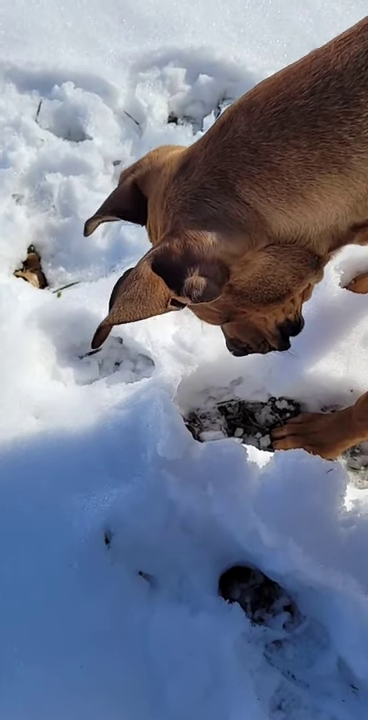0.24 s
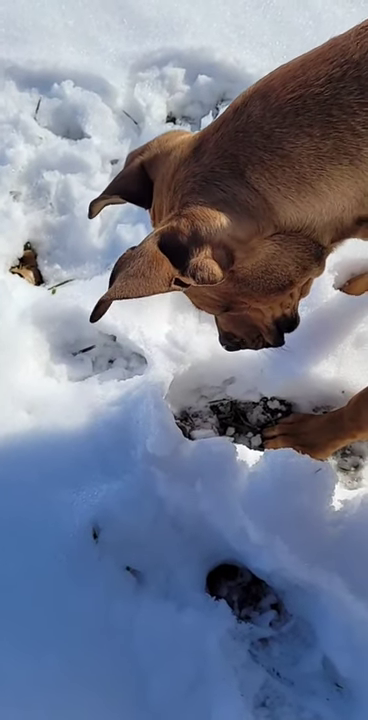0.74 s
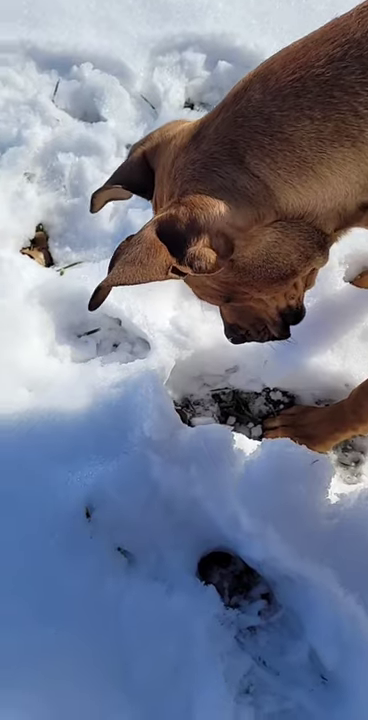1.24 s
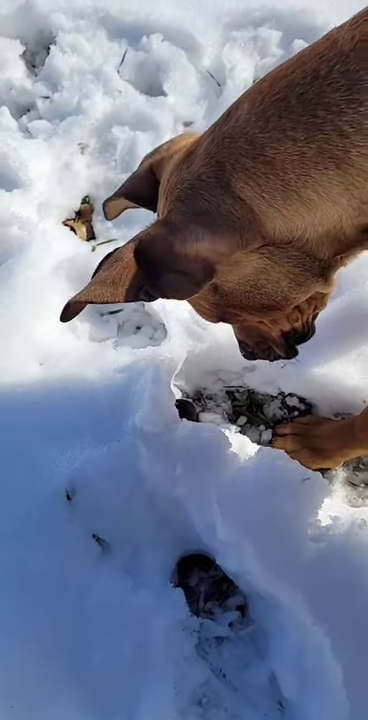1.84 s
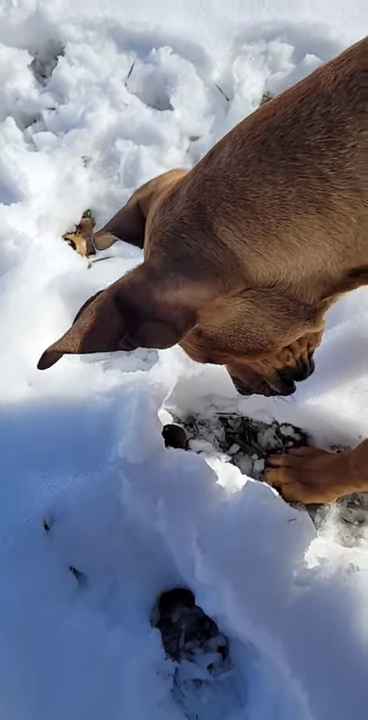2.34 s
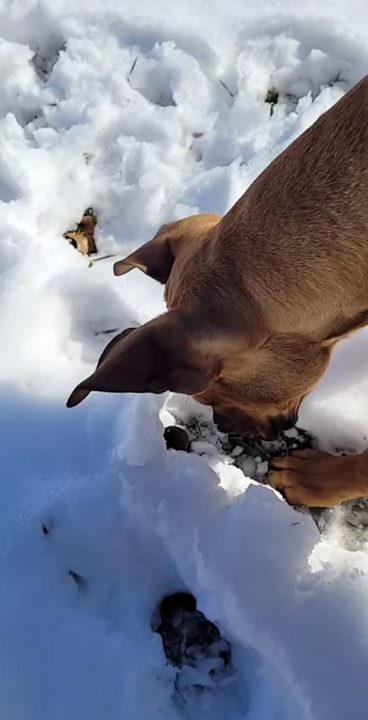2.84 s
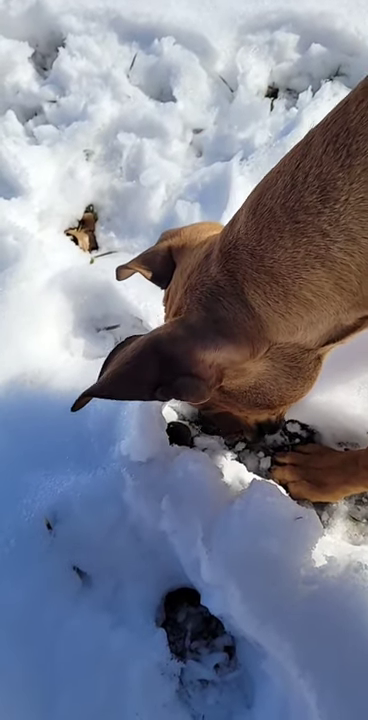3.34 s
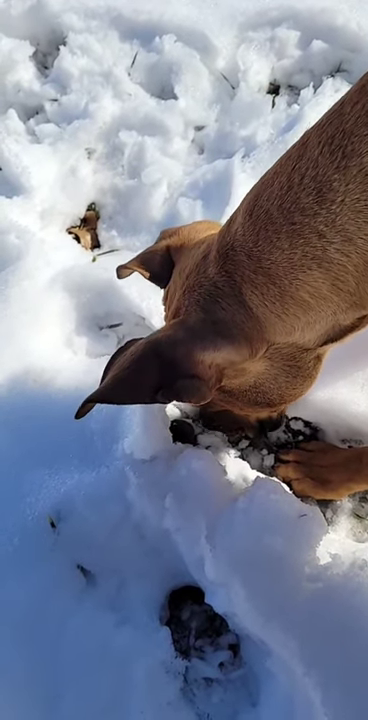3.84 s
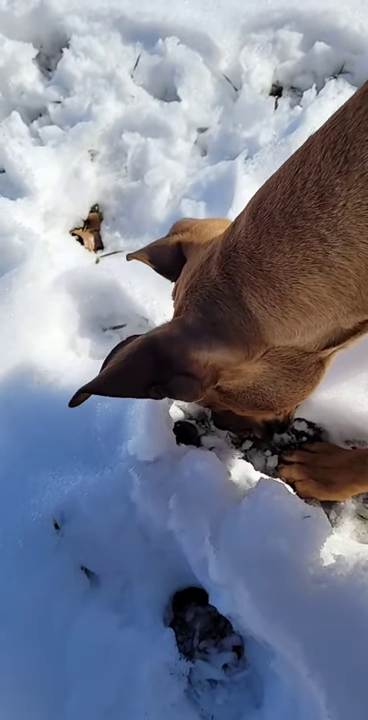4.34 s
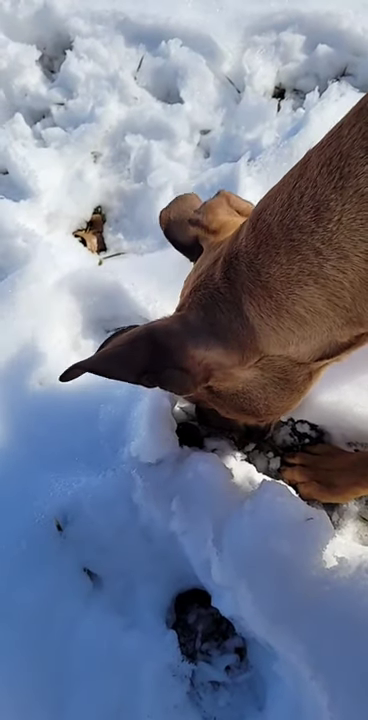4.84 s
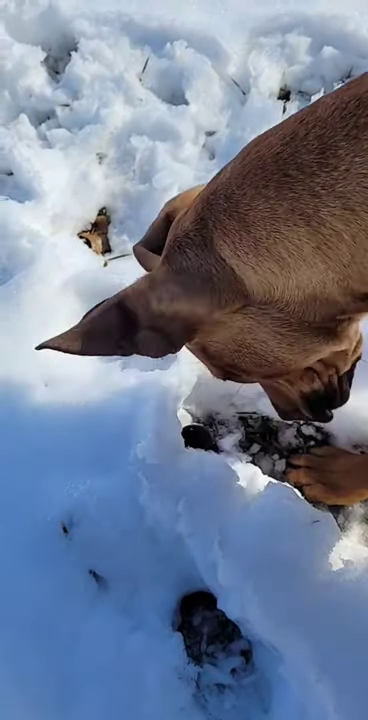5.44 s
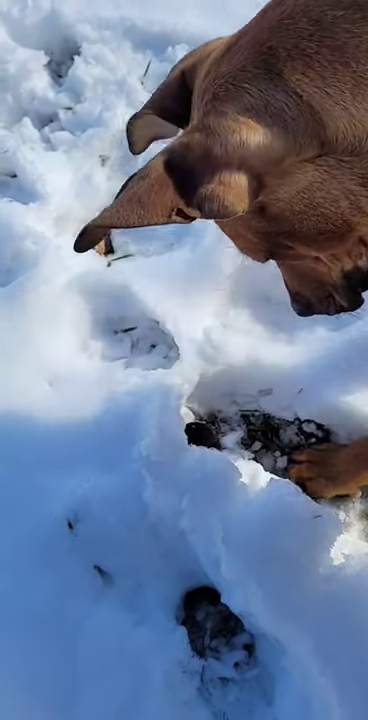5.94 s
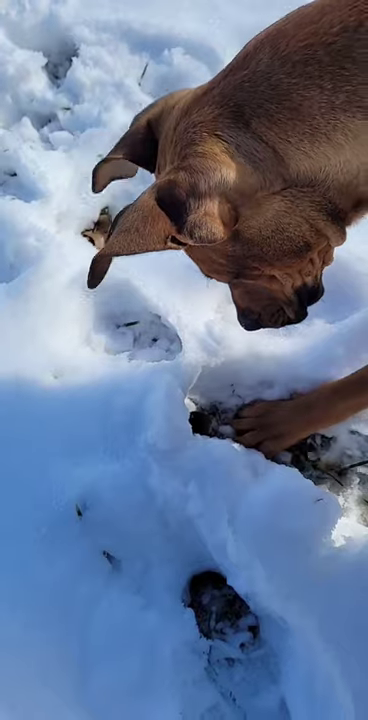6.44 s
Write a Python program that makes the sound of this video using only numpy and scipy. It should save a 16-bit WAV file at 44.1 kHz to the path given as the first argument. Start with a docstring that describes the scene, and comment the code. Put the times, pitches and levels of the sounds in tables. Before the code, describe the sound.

Close snow scuffling and soft paw thuds, then quiet with far engine drone, sparse sharp bird chips and faint sniffs, ending in crisp rustle and one tiny squeak.

```python
"""Far traffic hums under the fading ring of a bird chip; then a dog sniffs, snorts and paws at a hole in snow.
The dog is a step from a phone: coloured noise makes breath and snow, decaying modes make paw thuds.
The small animal inside squeaks once, a harmonic stack through a throat filter that breaks into breath.
The bird's gliding whistles ring back from walls and trees; traffic is flickering octave bands of noise.
One engine, three multiples of its firing rate, drones and then pulls away."""
import sys
import numpy as np
from scipy import signal
from scipy.fft import rfft, irfft
from scipy.io import wavfile
from scipy.ndimage import uniform_filter1d

SR = 44100
rng = np.random.default_rng(int(sys.argv[2]) if len(sys.argv) > 2 else 0)


def int16_out(signal):
    """Quantize to a 16-bit WAV file."""
    q = np.round(np.clip(np.atleast_2d(signal).T, -1, 1) * 32767)
    wavfile.write(sys.argv[1], SR, q.astype(np.int16))


N = 295911
T = np.arange(N) / SR


def undb(db):
    """Decibel law: amplitude grows tenfold every 20 dB."""
    return 10 ** (np.asarray(db) / 20)


def shape(x, points):
    """Linear filtering: weight the spectrum by (Hz, dB) points, steeply closed outside them."""
    hz, db = np.transpose(points)
    log_hz = np.log(np.fft.rfftfreq(len(x), 1 / SR) + 1)
    gain_db = np.interp(log_hz, np.log(hz), db, left=-90, right=-90)
    return irfft(rfft(x) * undb(gain_db), len(x))


def unit(x):
    """Normalisation: scale to a root-mean-square value of 1."""
    return x / np.sqrt(np.mean(x ** 2))


def noise(colour):
    """Random process: white noise given a spectral colour and unit power."""
    return unit(shape(rng.standard_normal(N), colour))


def walk(rate):
    """Slow random modulation: levels held 1 / rate s and slewed twice."""
    hold = int(SR / rate)
    steps = np.repeat(rng.standard_normal(N // hold + 1), hold)
    return uniform_filter1d(uniform_filter1d(steps, hold), hold)[:N]


def add(out, x, s):
    """Superposition: mix x into out from s seconds on."""
    i = int(round(s * SR))
    x = x[max(-i, 0):N - i]
    out[max(i, 0):max(i, 0) + len(x)] += x


SURGE_POWER = 1.4  # 1 = pointed, 2 = round top


def surges(rows):
    """Incoherent addition: gains swell to each peak and fade, adding in power, one line per dB column."""
    power = 0
    for s, rise, fall, db, *over in rows:
        # times below 2 ms, negative ones too, count as 2 ms
        away = np.where(T < s, (s - T) / max(rise, .002), (T - s) / max(fall, .002))
        peak_db = db + np.array([0] + over)[:, None]
        power = power + undb(2 * peak_db) * undb(-2 * 20 * away ** SURGE_POWER)
    return np.sqrt(power)


# spectral density of the microphone's own hiss: pitch_hz [Hz], density_db [dB per Hz]
HISS_COLOUR = [(1470, -20), (2500, -11.5), (3130, -1.5), (5450, -5), (6410, -7), (7650, 5.5), (8520, -4),
               (14300, -4), (15800, -4.5)]
HISS_DB = -89


def hiss():
    """Self-noise: a steady random signal of fixed spectrum."""
    return undb(HISS_DB) * noise(HISS_COLOUR)


# spectral density of the road noise: pitch_hz [Hz], density_db [dB per Hz]
TRAFFIC_COLOUR = [(20, -24), (45, -3.5), (65, 0), (110, -6), (155, -6), (190, -12.5), (280, -9), (420, -14),
                  (800, -15), (1050, -21.5), (1300, -40), (1800, -51), (3000, -56)]
# swells of the traffic: start_s [s], level_db [dB], bass_db [dB over level], tyre_db [dB over level]
TRAFFIC_SWELL = [(0.0, -67, -0.5, 3), (0.35, -63, -4, -1.5), (.8, -64, -3, 1.5), (1.57, -62.5, 0.5, -0.5),
                 (2.4, -63.5, -2, -1.5), (3.5, -61.5, -1, 0), (4.0, -62, 1.5, 0), (5.2, -62, 1, -1),
                 (6.1, -63.5, -0.5, 0.5), (6.71, -60, -1, -3.5)]


def traffic():
    """Band-wise modulation: octave bands flicker on their own; the bass swells as vehicles come and go."""
    s, db, bass_db, tyre_db = np.transpose(TRAFFIC_SWELL)
    road = rfft(shape(rng.standard_normal(N), TRAFFIC_COLOUR))
    octaves = np.log2(np.fft.rfftfreq(N, 1 / SR) + 1)
    # the level refers to the band around 530 Hz
    reference = np.std(irfft(road * (abs(octaves - np.log2(530)) < .4), N))
    out = 0
    for octave in np.arange(4, 13):
        band = irfft(road * np.clip(1 - abs(octaves - octave), 0, 1), N)
        bass_share = np.clip((9.0 - octave) / 2, 0, 1)
        band_db = bass_share * np.interp(T, s, bass_db) + 1.5 * walk(4.5)
        if octave == 10:  # tyre roar lies around 1 kHz
            band_db = band_db + np.interp(T, s, tyre_db)
        out = out + band * undb(band_db)
    return out / reference * undb(np.interp(T, s, db))


# course of the far engine: start_s [s], firing_hz [Hz, before its waver],
# first_db [dB, firing rate], lead_db [dB, leading overtone]
ENGINE_COURSE = [(2.3, 82, -62, -77), (2.6, 84, -58.5, -63.5), (3.1, 87.3, -59.5, -63),
                 (3.25, 90.6, -51, -63.5), (3.8, 91.9, -50.5, -60), (4.5, 91.8, -47.5, -64),
                 (5.5, 88.5, -50, -64.5), (5.75, 85, -70, -78), (6.0, 88.1, -66, -76),
                 (6.15, 93.9, -54, -76), (6.24, 97.85, -57.5, -59.5), (6.35, 101, -59, -57),
                 (6.56, 106.8, -50, -63), (6.64, 109.3, -63, -58.5), (6.71, 110, -60, -66)]
# overtone balance, one row droning and one pulling away: second_db, third_db [dB over lead_db]
ENGINE_OVERTONES = [(-11.5, -0.5), (0.5, -6.5)]
# waver of each multiple: spread_db [dB], phase_spread [radians], rate [changes per s]
AIR_WAVER = [(2.0, .3, 14), (3.0, .6, 20), (5.0, 2.5, 60)]
PULLS_AWAY_S = 5.9


def engine():
    """Harmonic series: three multiples of the firing rate, wavering most on top after the long way in air."""
    s, hz, first_db, lead_db = np.transpose(ENGINE_COURSE)
    firing_hz = np.interp(T, s, hz) * (1 + 0.011 * walk(12))
    phase = 2 * np.pi * np.cumsum(firing_hz) / SR
    levels_db = [np.interp(T, s, first_db)]
    for droning_db, leaving_db in np.transpose(ENGINE_OVERTONES):
        balance_db = np.where(T < PULLS_AWAY_S, droning_db, leaving_db)
        levels_db.append(np.interp(T, s, lead_db) + balance_db)
    out = 0
    for multiple, (db, (waver_db, turn, rate)) in enumerate(zip(levels_db, AIR_WAVER), 1):
        tone = np.sqrt(2) * np.sin(multiple * phase + turn * walk(rate))
        out = out + tone * undb(db + waver_db * walk(rate))
    fade_in = np.clip((T - s[0]) / 0.25, 0, 1)
    return fade_in * out


# colour of the ring from the trees: pitch_hz [Hz], level_db [dB]
TREE_COLOUR = [(5000, -1.5), (5800, 4.5), (6500, 4.5), (7400, 1), (12000, 5.5), (16000, -10)]
# echoes from house walls: delay_s [s], level_db [dB over the direct sound]
WALL_ECHOES = [(.011, -11), (0.057, -10)]
TREES_T60_S, TREES_DB = 0.69, -6.5


def space():
    """Impulse response: the direct sound, discrete wall echoes and a dense decaying ring from the trees."""
    t = np.arange(SR) / SR
    ring_db = -60 * t / TREES_T60_S + 1.4 * walk(37)[:SR]
    ring = shape(rng.standard_normal(SR), TREE_COLOUR) * undb(ring_db)
    ring = ring * np.clip(t / 0.0037, 0, 1)
    response = undb(TREES_DB) * ring / np.sqrt(np.sum(ring ** 2))
    response[0] = 1
    for delay, echo_db in WALL_ECHOES:
        response[int(delay * SR)] += undb(echo_db)
    return response


# glide of one chip: start_s [s from its start], pitch_hz [Hz, before the pitch factor], level_db [dB over peak]
CHIP_GLIDE = [(0, 5950, -40), (.0022, 6000, -9), (.0045, 6550, -4), (.0065, 6900, -7), (.010, 7150, -4),
              (.013, 7270, 0), (.017, 7350, -1), (.0188, 7500, -13), (.021, 7700, -3), (.0255, 7900, -36)]
# the chips: start_s [s], peak_db [dB, direct sound], pitch_factor [ratio], octave_db [dB over the whistle]
CHIP_CALLS = [(-.22, -54, 1.1, -32), (1.9637, -48.5, 1.002, -23), (3.7662, -46.5, 0.998, -18.5),
              (5.9597, -48, 0.9967, -16)]


def bird():
    """Frequency modulation and convolution: rising whistled chips sound through the response of the space."""
    s, hz, db = np.transpose(CHIP_GLIDE)
    t = np.arange(int(s[-1] * SR)) / SR
    level_db = uniform_filter1d(np.interp(t, s, db), size=30)
    octave_swell = np.exp(-((t - .003) / .0022) ** 2)  # most as the bill opens
    response, out = space(), np.zeros(N)
    for start, peak_db, factor, octave_db in CHIP_CALLS:
        phase = 2 * np.pi * np.cumsum(factor * np.interp(t, s, hz)) / SR
        tone = np.sin(phase) + undb(octave_db) * octave_swell * np.sin(2 * phase)
        chip = tone * undb(peak_db + level_db)
        add(out, signal.fftconvolve(chip, response), start)
    return out


# the squeak's arch: start_s [s], pitch_hz [Hz], level_db [dB, before the throat]
SQUEAK_ARCH = [(6.585, 2700, -75), (6.588, 2600, -48), (6.590, 2400, -45), (6.593, 2880, -41),
               (6.5955, 3100, -39), (6.600, 2780, -41), (6.603, 2400, -40), (6.609, 2000, -44),
               (6.6125, 2050, -48), (6.615, 2000, -64), (6.63, 2000, -75)]
# response of the tiny throat: pitch_hz [Hz], level_db [dB]
THROAT_COLOUR = [(1500, -48), (3000, -36), (4200, -15), (5200, -5), (6000, -3), (8200, 0), (10000, -4),
                 (11800, 0), (12800, -15), (14000, -30), (15900, -34)]
# the 3rd multiple drops out at the top of the arch: centre_s [s], width_s [s], depth_db [dB]
THIRD_DROPOUT = (6.5978, .0018, -26)
# the voice roughens away from its clearest moment, then is all breath
CLEAR_S, CLEAR_ROUGH, ROUGH_PER_S, BREAKS_S = 6.595, .05, 30, 6.613


def squeak():
    """Source and filter: fluttering harmonics pass a tiny throat, giving way to breath towards both ends."""
    s, hz, db = np.transpose(SQUEAK_ARCH)
    t = np.arange(s[0], s[-1], 1 / SR)
    rough = np.clip(CLEAR_ROUGH + ROUGH_PER_S * abs(t - CLEAR_S) + (t > BREAKS_S), 0, 1)
    gap_s, gap_width_s, gap_depth_db = THIRD_DROPOUT
    gap_db = gap_depth_db * np.exp(-((t - gap_s) / gap_width_s) ** 2)
    phase = 2 * np.pi * np.cumsum(uniform_filter1d(np.interp(t, s, hz), size=70)) / SR
    stack = 0
    for k in range(1, 8):
        flutter_db = -22 * rough * abs(walk(500)[:len(t)])
        stack = stack + np.sin(k * phase + k * k) * undb(flutter_db + (k == 3) * gap_db)
    breath = 1.7 * rough * rng.standard_normal(len(t))
    voice = (1 - rough) * stack + breath
    out = np.zeros(N)
    add(out, voice * undb(np.interp(t, s, db)), s[0])
    return shape(out, THROAT_COLOUR)


# soft sniffs deep in the hole: peak_s [s], rise_s [s per 20 dB], fall_s [s per 20 dB], peak_db [dB]
SNIFF_SURGES = [(4.05, 0.5, -0.3, -84), (4.35, 1.5, 0.5, -86), (4.79, 0.5, 0.1, -86),
                (5.04, 0.3, 0.25, -81), (5.38, 0.19, 0.19, -83), (5.65, .5, 1.3, -85.5),
                (6.2, 0.1, -0.2, -81.5), (6.4, 1, 4.98, -89.5)]
# spectral density of a sniff: pitch_hz [Hz], density_db [dB per Hz]
SNIFF_COLOUR = [(4000, -21), (5500, -8), (6500, -5), (7500, 2), (8300, -5.5), (9500, -14), (11000, -32)]


def sniffs():
    """Turbulence noise: soft breath deep in the hole is coloured noise in surges."""
    return surges(SNIFF_SURGES)[0] * noise(SNIFF_COLOUR)


# the tap: start_s [s], peak_db [dB], pitch_hz [Hz], t60_s [s]
TAP_KNOCK = (.9455, -62, 1470, .03)


def tap():
    """Free vibration: a small hard thing, knocked once, decays at a single pitch."""
    s, db, hz, t60 = TAP_KNOCK
    t, out = np.arange(SR // 10) / SR, np.zeros(N)
    add(out, np.sin(2 * np.pi * hz * t) * undb(db - 60 * t / t60), s)
    return out


# snow packing under the paw: peak_s [s], rise_s [s per 20 dB], fall_s [s per 20 dB], peak_db [dB]
PACKING_SURGES = [(1.35, 0.1, -0.03, -55), (1.52, -0.17, -0.07, -47), (1.576, 0.1, 0.03, -41.5)]
# spectral density of the packing snow: pitch_hz [Hz], density_db [dB per Hz]
PACKING_COLOUR = [(60, -11), (100, -5), (280, 7), (450, -10.5), (750, -3.5), (1200, -30)]


def packing():
    """Compaction noise: snow packing down under the paw is low coloured noise in surges."""
    return surges(PACKING_SURGES)[0] * noise(PACKING_COLOUR)


# paw blows: start_s [s], level_db [dB, before the modes' weights and soft onset], centre_hz [Hz, spectrum]
PAW_BLOWS = [(1.4669, -29, 280), (1.489, -38.5, 110), (1.508, -37.5, 132), (1.516, -31, 89),
             (1.553, -45, 330), (1.575, -30.5, 273.4), (1.593, -44, 330), (1.613, -40, 100),
             (1.655, -28.5, 330), (1.658, -30, 152), (1.674, -38.5, 54.7)]
# modes of packed snow and frozen ground: pitch_hz [Hz, before scatter], level_db [dB], t60_s [s]
GROUND_MODES = [(58, 0, .13), (130, 0, .11), (240, 1, .04), (320, 0, .045), (430, -3, .03)]


def thuds():
    """Modal excitation: each blow rings the ground's modes, most those near the centre of its spectrum."""
    t, out = np.arange(SR // 3) / SR, np.zeros(N)
    soft_onset = 1 - np.exp(-t / 0.0019)  # a paw lands softly
    for s, db, centre_hz in PAW_BLOWS:
        blow = 0
        for hz, mode_db, t60 in GROUND_MODES:
            excited_db = mode_db - 12.5 * np.log2(hz / centre_hz) ** 2
            scattered_hz = hz * (1 + 0.043 * rng.standard_normal())
            blow = blow + undb(excited_db - 60 * t / t60) * np.sin(2 * np.pi * scattered_hz * t)
        add(out, -blow * undb(db) * soft_onset, s)
    return out


# main, low, middle and high part of the snow's colour: pitch_hz [Hz], density_db [dB per Hz]
SNOW_PARTS = [
    [(4800, -21), (5500, 0), (6300, 1), (7900, 1.5), (8500, -10), (9800, -19.5)],
    [(900, -0.5), (1500, -0.5), (2400, -2), (2850, -6), (3200, -24)],
    [(3150, -11), (3600, -5), (4700, -2.5), (5400, -2.5), (6000, -18)],
    [(9000, -9), (10400, -6.5), (12300, 0.5), (13800, -5.5), (16000, -7.5)],
]
# nose and paws in the snow: peak_s [s], rise_s [s per 20 dB], fall_s [s per 20 dB], peak_db [dB],
# low_db, middle_db, high_db [dB over peak_db]
SNOW_RUSTLES = [(.36, 0.049, 0.047, -91, -15, -15, -10.5), (.435, 0.045, 0.063, -72, -18.5, -16.5, -2.5),
                (.53, 0.12, 0.05, -64.5, -14.5, -6, -1.5), (.582, 0.038, 0.025, -61.5, 4, 0, 0),
                (.62, 0.022, 0.096, -85.5, 3.5, -5, 1), (.78, .05, 0.072, -94, -10, -20, -12),
                (1.0, 0.176, 0.133, -85, -6, -11, -5), (1.04, 0.018, 0.045, -84, -6, -12, 8.5),
                (1.12, 0.078, .06, -73, -6, -12, -12), (1.2, 0.086, 0.14, -66.5, -9, -6, -5),
                (1.28, 0.16, 0.075, -70.5, -4, -16, -7), (1.348, 0.0647, 0.11, -63, -3.5, -5, -1),
                (1.425, 0.12, 0.065, -65.5, -6.5, -6, -6), (1.47, 0.013, 0.047, -61.5, -2, -4, -3),
                (1.51, 0.0062, 0.16, -59, 1, -2, -7), (1.59, 0.119, 0.0813, -59.5, 0.5, -4, -5.5),
                (1.66, 0.012, .022, -54.5, -2, -5, -2.5), (1.7, 0.034, 0.07, -74, -4, -0.5, -2.5),
                (1.79, 0.21, 0.15, -76, -13.5, 0, -3.5), (6.11, .04, .04, -92, 7, 10, 5),
                (6.473, 0.0067, 0.041, -55.5, -22, -6.5, -1), (6.493, 0.029, 0.034, -61.5, -1, 0, 3.5),
                (6.55, 0.042, 0.08, -80.5, 0, -2.5, 0), (6.592, 0.0065, 0.059, -70.5, -5.5, 1, 3),
                (6.652, 0.0084, 0.009, -70.5, -8, -1, 5.5), (6.68, 0.064, 0.11, -87, -9, -1.5, 4)]
# snapping crusts of snow: start_s [s], peak_db [dB], low_db, middle_db, high_db [dB over peak_db]
CRUST_SNAPS = [(.566, -56, -10.5, -3, -9), (0.603, -74, 18, -11, -5), (.6604, -80, -12, -6, -13),
               (0.9468, -70, -12, -20, 6.5), (1.0313, -81, -12, -16, 7), (1.3265, -59, -11, -21, 3),
               (1.4666, -59.5, 3.5, 4.5, -5), (1.5086, -52.5, 5.5, 4.5, -7), (1.6578, -46.5, 1.5, -9, -4),
               (1.8974, -66.5, -3, -1.5, -27), (2.0467, -72, -2, -13.5, -31),
               (2.6974, -70, -15, -6.5, -5.5), (5.7889, -82, 15, -10, -16), (6.0325, -76, 11, -4, 5),
               (6.076, -86, 4, 10.5, 1), (6.102, -89, 9, 10, 3), (6.165, -80, -4, -5, 1),
               (6.4776, -42, -15, -27, -21), (6.5274, -54.5, 0, -2, -1), (6.5627, -74, -18, -15, 3),
               (6.6493, -71, -11, -8, 5)]
SNAP_T60_S = 0.0098


def scuffle():
    """Granular noise: breath and crumbling snow are dense grains, and crusts snap, in four parts of colour."""
    gains = surges(SNOW_RUSTLES)
    t = np.arange(SR // 5) / SR
    for s, db, *over in CRUST_SNAPS:
        for gain, part_db in zip(gains, [0] + over):
            add(gain, undb(db + part_db - 60 * t / SNAP_T60_S), s)
    out = 0
    for gain, colour in zip(gains, SNOW_PARTS):
        grains = rng.standard_normal(N) * undb(2.0 * rng.exponential(size=N))
        flicker_db = 1.5 * walk(60) + 1.8 * walk(18)
        out = out + gain * unit(shape(grains, colour)) * undb(flicker_db)
    return out


SIDE_DB, SIDE_HZ = -13, 7400.


def scene():
    """Mixing: all sounds sit in the centre; scuffle and squeak get a faint scattered treble of opposite
    sign left and right."""
    voiced = scuffle() + squeak()
    paw = thuds() + tap() + packing()
    far = bird() + engine() + traffic()
    mid = voiced + paw + far + sniffs() + hiss()
    scatter = rng.standard_normal(512) * np.exp(-np.arange(512) / 400)
    scattered = np.convolve(voiced, unit(scatter) / np.sqrt(512))[:N]
    treble = signal.butter(4, SIDE_HZ, "high", fs=SR, output="sos")
    side = signal.sosfilt(treble, scattered)
    return mid + undb(SIDE_DB) * side * np.array([[1], [-1]])


TOP_HZ = 16050


def record(dry):
    """Band limiting: the phone cuts the top with a steep elliptic low-pass."""
    return signal.sosfilt(signal.ellip(10, .2, 60, TOP_HZ, fs=SR, output="sos"), dry)


dry = scene()
out = record(dry)
int16_out(out)
```